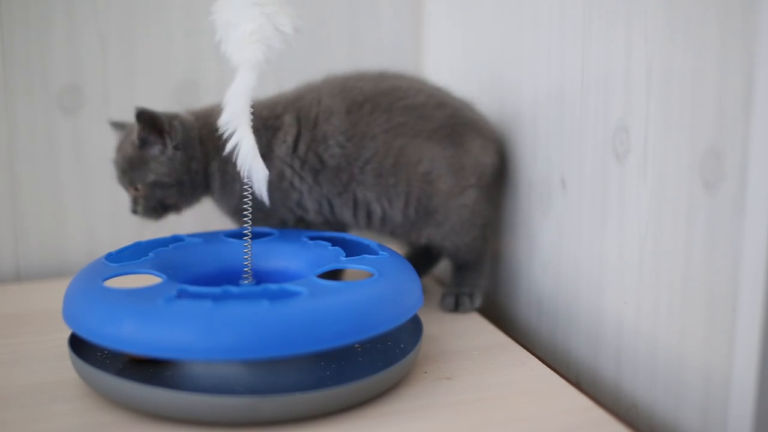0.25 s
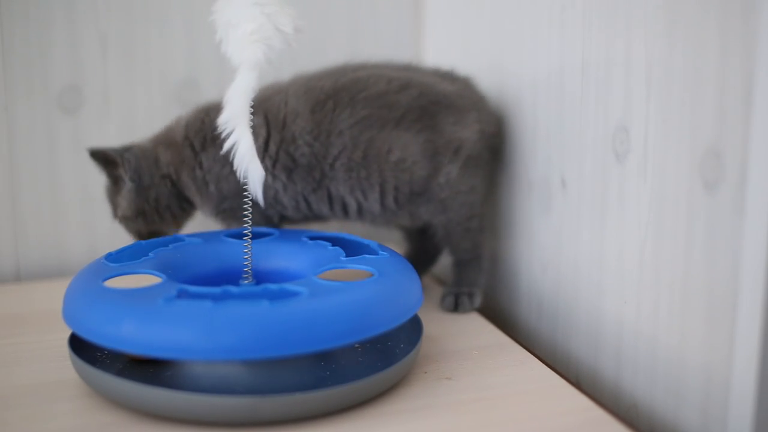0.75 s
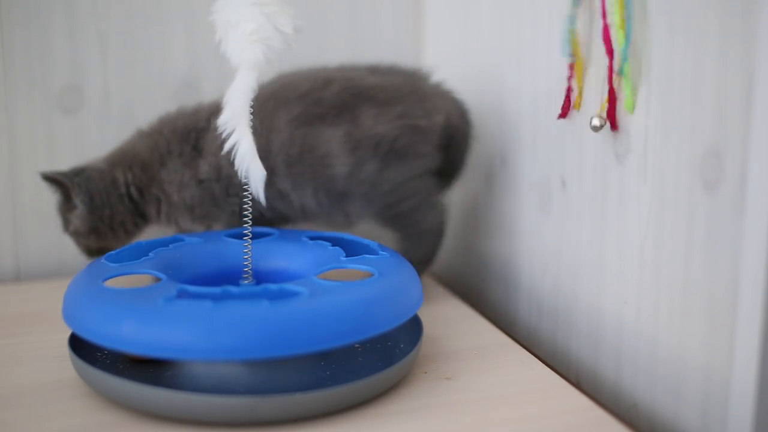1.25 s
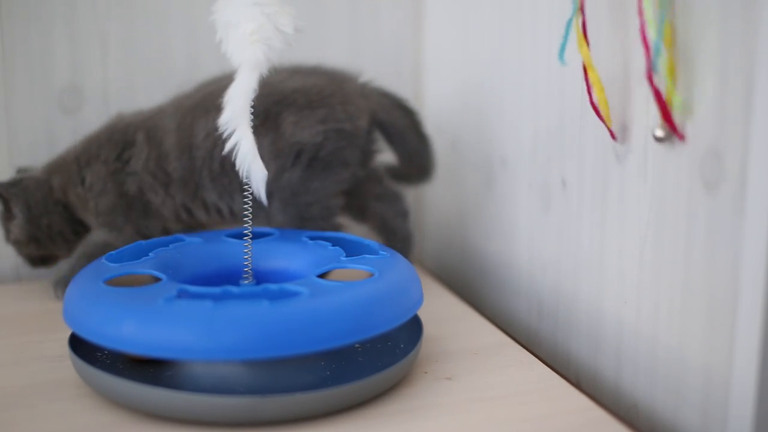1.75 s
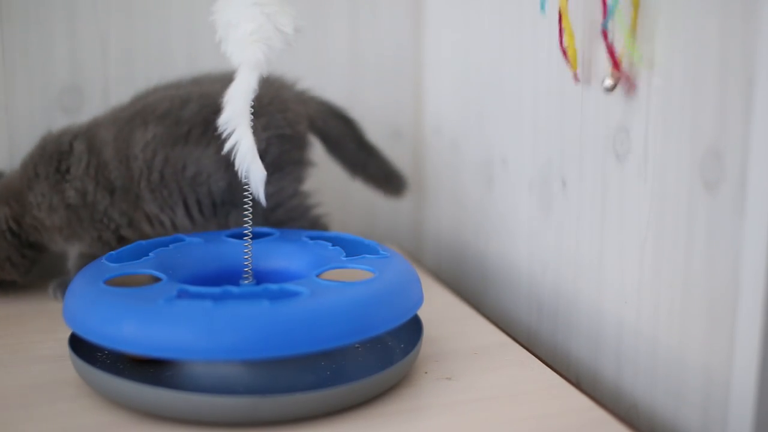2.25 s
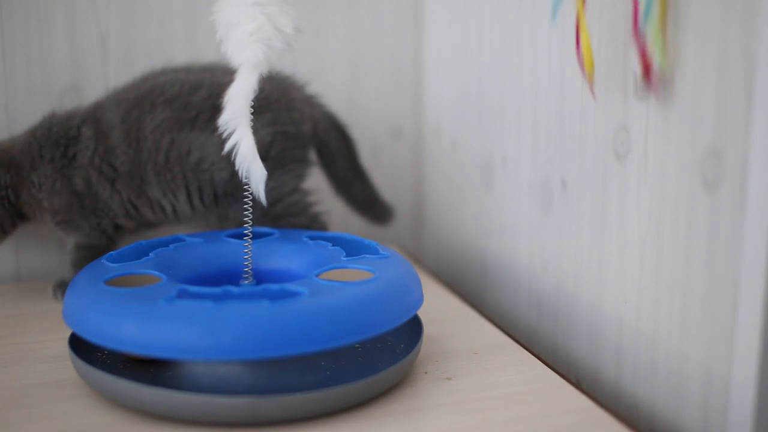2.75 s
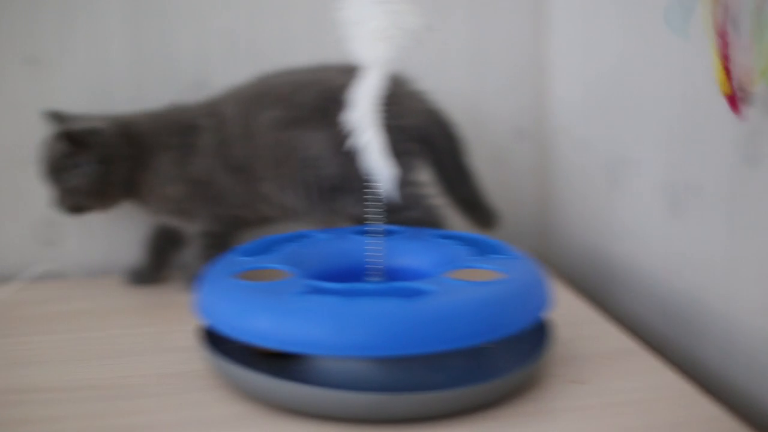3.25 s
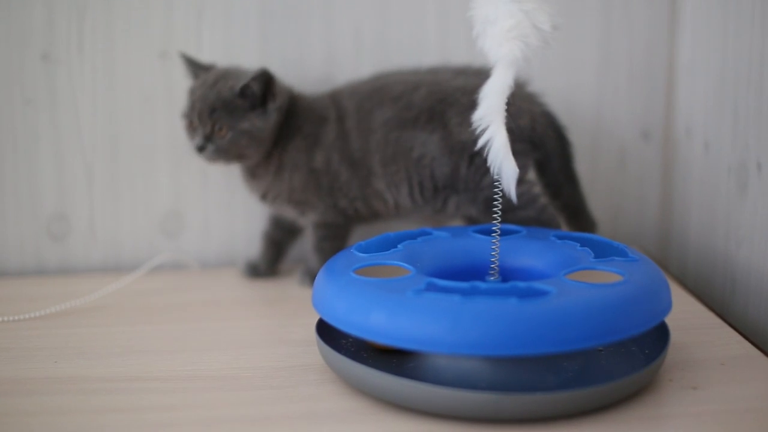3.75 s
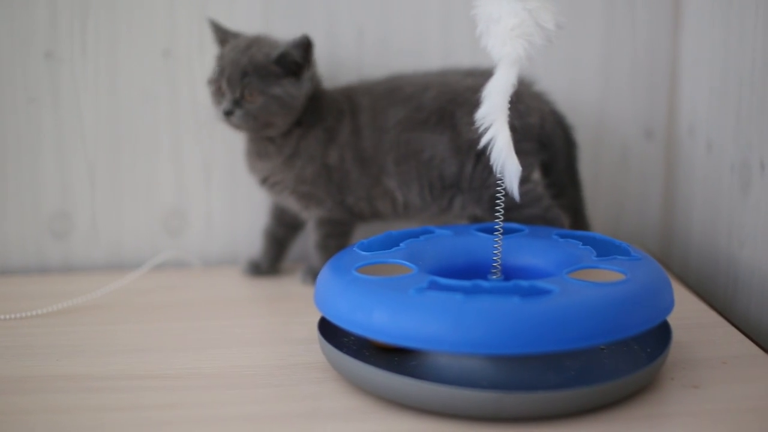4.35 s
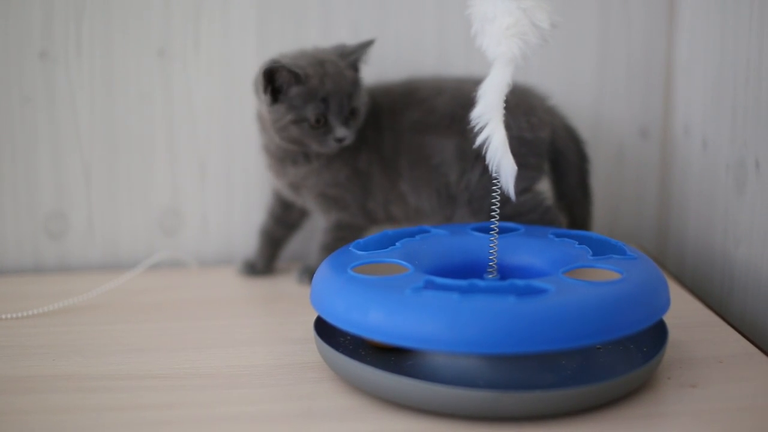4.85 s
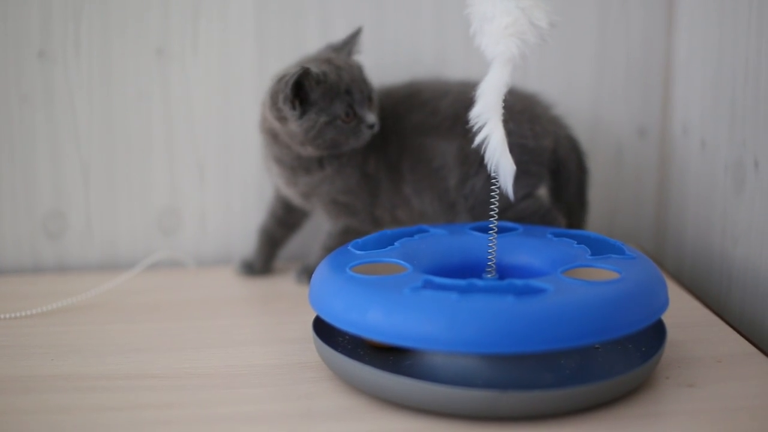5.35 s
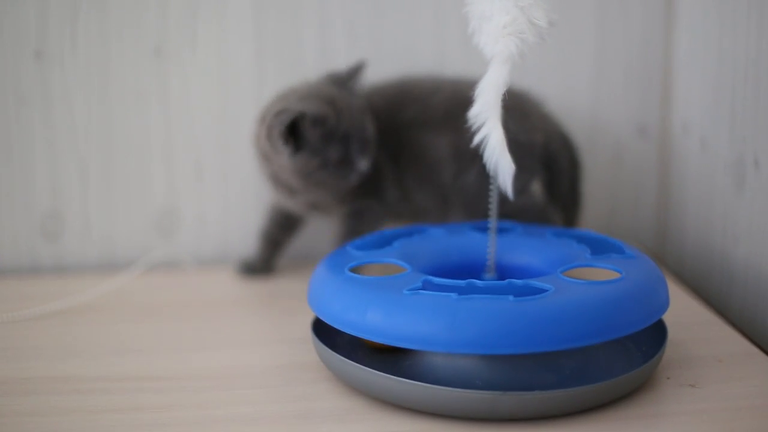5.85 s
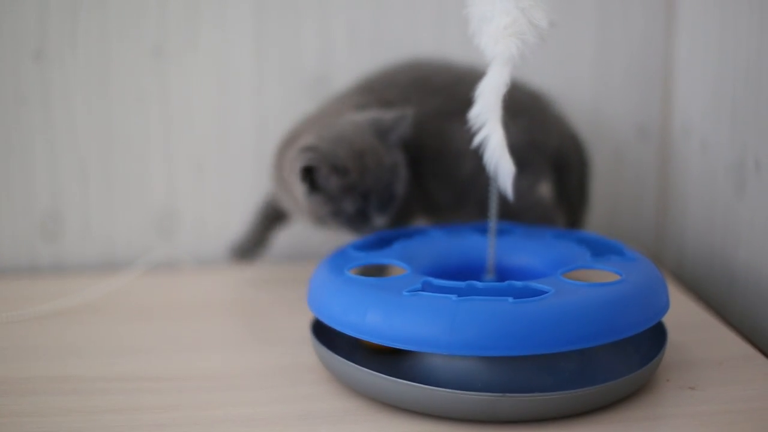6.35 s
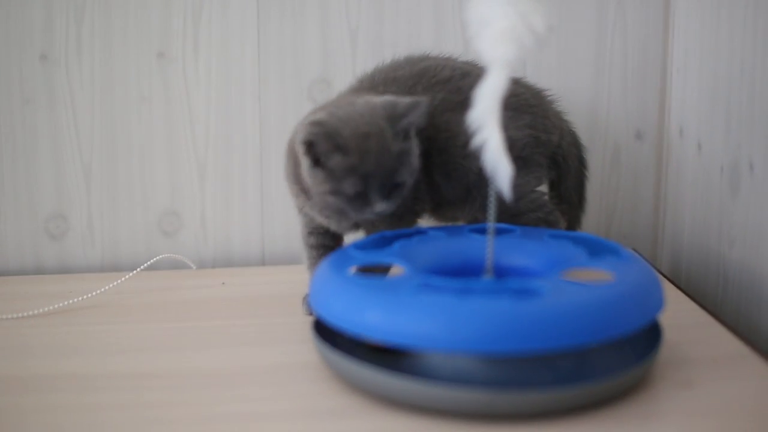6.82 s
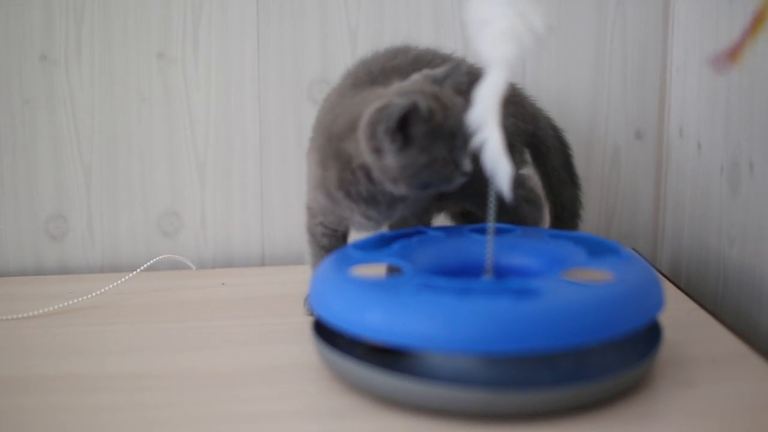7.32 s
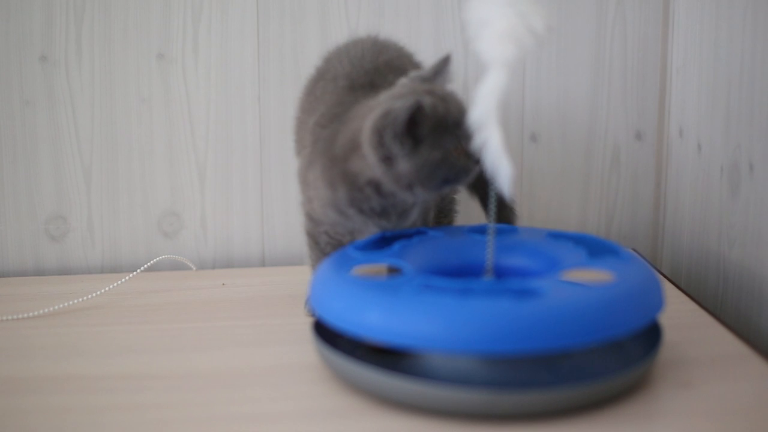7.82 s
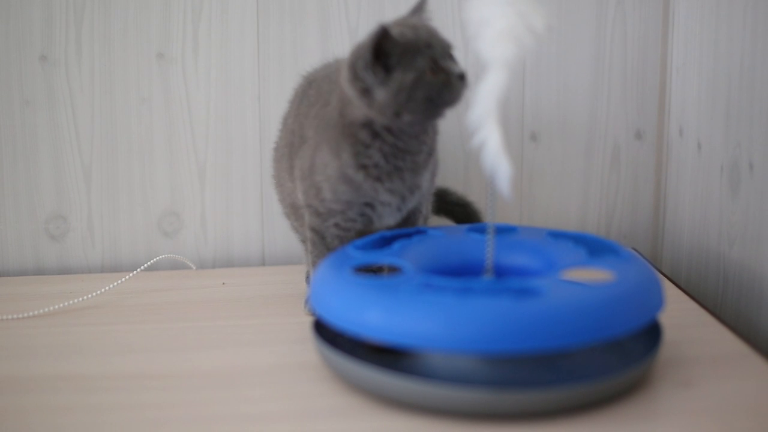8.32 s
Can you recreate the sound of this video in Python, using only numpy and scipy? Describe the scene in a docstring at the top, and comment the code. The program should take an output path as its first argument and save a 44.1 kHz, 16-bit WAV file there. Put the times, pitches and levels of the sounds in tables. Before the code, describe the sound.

Hollow wooden knocks from a kitten's light steps and toy contacts, with hard plastic clicks, small jingling bells, low rubs and scrapes over steady hiss.

```python
"""A toy wand on a hollow wooden surface in a small room, over a steady hiss of filtered noise.
Low rubs, made of resonant noise, and jingling bells, made of struck modes, open at about 1.2 s. From 1.4 s
taps ring the wood: filtered pulses, echoes and decaying sines. Hard plastic clicks, short filtered crackles,
crowd in near 3 s among gritty noise scrapes and soft thumps of damped sine. At 5.1 s a scuff rings, more
rubbing follows, then come the last taps, a bell jingle near 7.6 s and one final click at 8.5 s."""
import sys
import numpy as np
from scipy import signal
from scipy.fft import rfft, irfft, next_fast_len
from scipy.io import wavfile
from scipy.ndimage import uniform_filter1d

SR = 44100
rng = np.random.default_rng(int(sys.argv[2]) if len(sys.argv) > 2 else 0)


def how_loud(loudness_db):
    """Turn decibels into a plain amplitude multiplier (0 dB gives 1, 20 dB gives 10)."""
    steps = np.asarray(loudness_db, float) / 20
    return 10 ** steps


def output_pcm(signal):
    """Save a mono or channel-first signal as 16-bit PCM at the path in sys.argv[1].

    Samples are clipped to [-1, 1] before scaling.
    """
    pcm = np.clip(np.atleast_2d(signal).T, -1, 1) * 32767
    wavfile.write(sys.argv[1], SR, np.round(pcm).astype(np.int16))


N = 378378
SPAN = SR * 2 // 5  # samples given to one ring or room tail


def unit(x):
    """Scales a signal to rms 1."""
    return x / np.sqrt(np.mean(x ** 2) + 1e-20)


def along(points, hz):
    """Reads (Hz, value) points on a log frequency axis."""
    f, v = np.transpose(points)
    return np.interp(np.log(hz + 1), np.log(f + 1), v)


def spectrum(points):
    """Turns (Hz, dB) points into a gain of frequency."""
    return lambda hz: how_loud(along(points, hz))


def resonant(peaks):
    """Sums band-pass resonances, each (centre Hz, width Hz, dB), into one response of frequency."""
    return lambda f: sum(how_loud(db) * 1j * f * w / (c * c - f * f + 1j * f * w) for c, w, db in peaks)


def bump(hz, centre_hz, octaves):
    """A bell-shaped weight on a log frequency axis."""
    return np.exp(-.5 * (np.log2((hz + 1) / centre_hz) / octaves) ** 2)


def noise(response):
    """Noise of rms 1 coloured by a response of frequency."""
    m = next_fast_len(N)
    white = rfft(rng.standard_normal(m))
    return unit(irfft(white * response(np.fft.rfftfreq(m, 1 / SR)), m)[:N])


def pulse(db, size=2048):
    """The most compact causal (minimum-phase) pulse with the dB spectrum db(Hz), peak 1."""
    cepstrum = irfft(np.log(how_loud(db(np.fft.rfftfreq(size, 1 / SR)))), size)
    cepstrum[1:size // 2] *= 2  # fold the backward half of time onto the forward half
    cepstrum[size // 2 + 1:] = 0
    p = irfft(np.exp(rfft(cepstrum)), size)
    return p / np.abs(p).max()


def add(track, s, sound):
    """Mixes a sound into the track at s seconds."""
    part = track[round(s * SR):][:len(sound)]
    part += sound[:len(part)]


def tail():
    """A new diffuse room answer of energy 1: noise in which each frequency dies at its own speed."""
    # room decay: f/Hz, time to fall by 60 dB/s
    room_decay = [(120, 0.54), (400, 0.25), (1000, 0.31), (2800, 0.37), (7000, 0.4), (15000, 0.22)]
    hz, t, z = signal.stft(rng.standard_normal(SPAN), SR, nperseg=256)
    t60 = np.clip(along(room_decay, hz), .05, 2)[:, None]
    x = signal.istft(z * how_loud(-60 * t / t60), SR, nperseg=256)[1][:SPAN]
    x = x * (1 - np.exp(-np.arange(SPAN) / SR / 0.00033))  # soft onset
    return x / np.linalg.norm(x)


def grit(rate, depth_db):
    """Random gain of rms 1 that heads for a new value rate times a second."""
    knots = rng.standard_normal(int(N * rate / SR) + 2)
    return unit(how_loud(depth_db * np.interp(np.arange(N) * rate / SR, np.arange(len(knots)), knots)))


def strokes(rows):
    """Gains of both layers: each stroke presses down, fades as it slows, and lets go."""
    rise = 0.093  # share of a stroke spent pressing down
    gain = np.zeros((2, N))
    for s, length, first_db, second_db, fade_db in rows:
        u = np.linspace(0, 1, round(length * SR))
        shape = np.minimum(u / rise, 1) * how_loud(-fade_db * np.maximum(u - rise, 0))
        add(gain[0], s, how_loud(first_db) * shape)
        add(gain[1], s, how_loud(second_db) * shape)
    return uniform_filter1d(gain, size=300, axis=1)


def taps():
    """Each tap is a sharp pulse with early echoes and room tail, and rings the wood at new strengths."""
    # taps, levels before trims: t/s, level/dB, mid/dB, treble/dB, direct spike over the level/dB
    tap_rows = [(1.427, -14.5, -7.5, -35.5, -2), (1.704, -34, -24, -33.5, -5), (1.891, -35, -75, -41, -4),
                (2.013, -29.5, -1, -17, -5), (2.044, -32.5, -14, -26, -7), (2.25, -4, -1, -27.5, 4.5),
                (2.767, -20, -11.5, -31.5, -9), (3.115, -12, -5, -32, -4), (3.28, -15.5, -5.5, -35.5, -6),
                (3.589, -25.5, -11, -39, -22), (3.617, -26.5, 4, -35, -3), (3.837, -7, -4, -32.5, 1),
                (4.213, -1.5, -2, -27.5, 2.5), (4.404, -2, -1, -24, -12), (4.563, -6, -2.5, -28, 2.5),
                (4.743, -25.5, -5, -18, -3), (4.814, -11.5, -5, -32.5, 1), (5.085, -37, -3, -21, 10),
                (5.257, -16, -2.5, -31.5, -9), (6.788, -35, -21, -33.5, -6), (6.811, -40, -22, -29, 0),
                (7.2, -12, 0.5, -30.5, 1), (7.56, -29, -14, -33, -13), (7.895, -9.5, -2, -34, -4),
                (8.284, -6, -1.5, -32, 2), (8.473, -16, -4.5, -37, -12)]
    # modes of the wood: f/Hz, relative level/dB, longest time to fall by 60 dB/s
    wood_modes = [(188, -12.5, 0.85), (277.8, -7, 0.23), (340, -1, 0.18), (426, -5, 0.53), (477, -51, 0.11),
                  (580, -1, 0.5), (600.9, 1.5, 0.15), (612.6, 2, 0.19), (679, -8.5, 0.31),
                  (680, -4.5, 0.63), (731, -5, 0.66), (857.5, -2, 0.086), (961, -9.5, .28), (923, -9.5, .3),
                  (1054, -5.5, .28), (1143, -19.5, 0.068), (1343, -14, 0.9), (1450, -12.5, 0.57),
                  (1830, -24, 0.98), (1982, -15.5, 0.33)]
    # colour of a blow before its own mid and treble: f/Hz, relative level/dB
    blow_colour = [(40, -66), (100, -17.5), (220, -19), (340, 0), (490, -6), (620, -3.5), (1100, -8),
                   (2800, -21), (4500, -23.5), (8000, -27.5), (11500, -27.5), (16000, -41.5)]
    # early echoes off the walls, before the tap's own gain: delay/s, level/dB
    wall_echoes = [(.0022, -8), (.0036, -9), (.0058, -16.5), (.0095, -15)]
    out, t = np.zeros(N), np.arange(SPAN) / SR
    # close neighbours make each mode beat, alike at every tap
    knots = rng.standard_normal((len(wood_modes), 2, 30))
    beats = [np.interp(t, np.arange(30) / 70, a + 1j * b) for a, b in knots]
    corner = tail()  # the taps land near one spot and share much of their echo
    tick = pulse(lambda hz: 40 * bump(hz, 9500, 0.74), size=256)
    for s, db, mid_db, treble_db, spike_db in tap_rows:
        def harder(hz):
            """Mid and treble lift of this tap in dB."""
            return (mid_db + 10.5) * bump(hz, 2310, 0.79) + (treble_db + 27.5) * bump(hz, 7900, 1.0)

        def direct(hz):
            """Spectrum in dB of the direct sound, which is brighter."""
            lows_and_top = 14 * bump(hz, 61, 0.8) + 6 * bump(hz, 13000, 0.56)
            return 0.76 * along(blow_colour, hz) + harder(hz) - lows_and_top

        blow = pulse(lambda hz: along(blow_colour, hz) + harder(hz))
        space = how_loud(9) * (.6 * corner + .8 * tail())
        for delay, wall_db in wall_echoes:
            space[round(delay * SR)] += how_loud(wall_db)
        add(out, s, how_loud(db - 0.5) * signal.fftconvolve(blow, space)[:SPAN])

        ring = np.zeros(SPAN)
        for (hz, mode_db, t60), beat in zip(wood_modes, beats):
            fall_db = 60 * (t / min(t60, 0.2 + 15 / hz)) ** 1.336  # holds, then falls fast
            strength = how_loud(mode_db + harder(hz) + rng.normal(0, 1.37) - fall_db)
            swing = 1.1 * np.exp(.6j * rng.normal()) + .5 * beat
            ring += strength * (swing * np.exp(2j * np.pi * hz * t)).imag
        ring *= 1 - np.exp(-t / (0.0029 * how_loud(-spike_db)))  # soft taps swell
        add(out, s, how_loud(db - 20.0) * ring)

        add(out, s, how_loud(db + spike_db + 2.0) * pulse(direct))
        # something loose ticks just after the blow
        rattle = rng.standard_normal(300) * how_loud(-60 * t[:300] / 0.0097)
        add(out, s + 0.0055, how_loud(db + treble_db - 9.0) * np.convolve(rattle, tick))
    return out


def clicks():
    """A few milliseconds of crackle in a broad mid resonance and in the treble, with some room."""
    # plastic clicks, body and treble before trims: t/s, body level/dB, centre f/Hz, treble level/dB, room/dB
    click_rows = [(1.724, -38.5, 1550, -47, 11.5), (1.8137, -25, 3070, -33.5, 5),
                  (2.8395, -13, 1830, -43, -8), (2.8516, -12.5, 2490, -31, 6.5),
                  (2.8778, -7, 1390, -20, -5), (2.8799, -3, 1400, -32, -21), (3.0492, -13.5, 1130, -51, -1),
                  (3.054, -16.5, 1730, -47, -25), (3.1449, -1, 2400, -35, -12),
                  (3.1485, -4.5, 1580, -33, -3.5), (3.1626, -13, 1360, -37, -14),
                  (3.1956, -14.5, 2460, -46, -4.5), (3.5887, -21.5, 1340, -60, -6),
                  (3.6177, -16.5, 1290, -41, -5), (3.626, -16, 1310, -47, -12.5),
                  (4.7084, -27.5, 2980, -37.5, 8), (4.7541, -20.5, 2490, -32.5, 7),
                  (5.0877, -28.5, 1600, -35, -6), (5.448, -37, 1810, -35, 2), (5.474, -23.5, 1230, -43, -8),
                  (5.4881, -23, 2100, -48, 2), (5.5132, -10, 1610, -64, 4), (5.566, -28, 1830, -41.5, 5.5),
                  (5.66, -24, 2820, -44, -21), (5.679, -29, 1830, -56, -15), (5.713, -40, 2040, -49, -8),
                  (5.772, -39, 2130, -49, -1), (5.7983, -32, 4140, -59, -4), (5.8167, -33, 3950, -51, -15),
                  (5.877, -33.5, 2070, -40, -9), (5.885, -41, 2000, -45, -15),
                  (6.3611, -10.5, 3430, -20, -11.5), (6.3958, -20.5, 1880, -35, -13),
                  (6.3992, -18, 3590, -35, -21), (8.5281, -22.5, 1410, -31, -17)]
    out, t = np.zeros(N), np.arange(SR // 20) / SR
    fine = pulse(lambda f: 40 * bump(f, 7570, 0.57), size=512)
    fine /= np.linalg.norm(fine)
    for s, db, hz, treble_db, room_db in click_rows:
        # 15 ms to fall by 60 dB at a table level of -20 dB; harder clicks last longer
        t60 = 0.015 * how_loud(0.061 * (db + 20))
        crackle = rng.standard_normal(len(t)) * how_loud(-60 * t / max(t60, .002))
        crackle /= np.linalg.norm(crackle)
        body = pulse(lambda f: 40 * bump(f, hz, 1.66) - 12 * bump(f, 14000, 1.0), size=512)
        body /= np.linalg.norm(body)
        colour = how_loud(db + 11) * body + how_loud(treble_db + 16.5) * fine
        add(out, s, signal.fftconvolve(crackle, colour))
        add(out, s, how_loud(room_db) * signal.fftconvolve(colour, tail()))
    return out


def bells():
    """A shake strikes the bell modes, then the pellets bounce on; many weak modes blur into a shimmer."""
    # shakes, levels before trims: t/s, level of mode groups 0, 1 and 2/dB (three columns), shimmer level/dB
    shake_rows = [(1.24, -49, -60, -55, -45), (1.3024, -55, -68, -65, -49), (1.7676, -55, -63, -56, -48),
                  (2.1115, -37.5, -47.5, -46.5, -38), (2.1497, -40, -62, -61, -54),
                  (2.7359, -29, -50, -34, -31), (2.75, -30, -47.5, -49, -37), (2.8034, -50, -56, -54, -62),
                  (2.9462, -40.5, -47, -42, -28.5), (2.9994, -52, -51, -48, -49),
                  (3.1274, -43, -54, -46, -27.5), (3.3078, -30.5, -47, -47, -31.5),
                  (3.3385, -56, -60, -48, -48), (3.458, -49, -49, -47, -34.5), (3.604, -50, -66, -52, -41),
                  (4.8419, -43, -51, -45, -37.5), (4.8555, -45, -51, -45.5, -52),
                  (7.5677, -46, -64, -66, -66), (7.5914, -48, -64, -59, -50),
                  (7.653, -41, -53.5, -48, -36.5), (7.708, -46, -54, -57, -57)]
    # bell modes: f/Hz, relative level/dB, ring time before shortening/s, mode group
    bell_modes = [(4125, 3, .18, 1), (4410, 4, .22, 1), (4560, -3, .15, 1), (4872, -8, .2, 0),
                  (4900, 0, .22, 0), (9005, -1, .2, 2), (9606, 0, .2, 2), (10085, 2, .22, 2),
                  (10125, -2, .2, 2), (11538, 3, .2, 2), (11566, 2, .2, 2), (15385, -15, .16, 2)]
    # colour of the shimmer noise: f/Hz, relative level/dB
    shimmer_colour = [(3500, -59), (4500, 0), (6000, -7), (7500, -1), (9500, -2.5), (12000, -20),
                      (16000, -20)]
    out, shimmer, t = np.zeros(N), np.zeros(N), np.arange(SPAN) / SR
    for s, *group_db, shimmer_db in shake_rows:
        # the first blow lands at once, 15 weaker bounces follow
        bounce_s = np.cumsum(rng.exponential(.014, size=16)) * (np.arange(16) > 0)
        strength = how_loud(-60 * bounce_s / 0.33 - 18.7 * (bounce_s > 0))
        place = np.minimum(bounce_s * SR, SPAN - 1).astype(int)
        for hz, db, t60, group in bell_modes:
            spread_db = rng.normal(0, 5.0, size=16) * np.where(bounce_s > 0, 1, 0.4)
            phase = np.exp(2j * np.pi * rng.random(size=16))
            blows = np.zeros(SPAN, complex)
            blows[place] = strength * how_loud(spread_db) * phase
            pole = how_loud(-60 / (0.62 * t60 * SR)) * np.exp(2j * np.pi * hz / SR)
            ring = signal.lfilter([1], [1, -pole], blows).real
            add(out, s, how_loud(db + group_db[group] - 2) * ring)
        fade = how_loud(shimmer_db - 4.5 - 60 * t / 0.35)
        add(shimmer, s, fade * (1 - np.exp(-t / 0.0025)))
    out += how_loud(5.0) * signal.fftconvolve(out, tail())[:N]
    return out + shimmer * noise(spectrum(shimmer_colour))


def scrapes():
    """Sliding friction: gritty noise in a mid scrape and a fine hiss that share each stroke."""
    # sliding strokes: t/s, length/s, scrape level/dB, hiss level/dB, fade rate/dB per stroke length
    slide_rows = [(1.52, .17, -53, -56.5, 7), (1.81, 0.087, -45, -53, 18), (1.99, 0.058, -50, -53, 18),
                  (2.38, 0.337, -50, -54, 8.5), (2.855, 0.079, -22.5, -29, 15),
                  (2.935, 0.087, -37, -41, 14), (3.155, 0.054, -28, -43, 18), (3.19, 0.071, -47, -44.5, 11),
                  (3.59, .12, -51, -61, 15), (5.095, 0.055, -40, -48, 12), (5.145, .11, -48.5, -51, 0),
                  (5.44, 0.071, -50.5, -50.5, -6), (5.5, 0.17, -34, -54, 26), (5.652, 0.032, -46, -56, 5),
                  (5.69, 0.26, -52, -59, 5), (6.04, 0.15, -51, -60.5, 11), (6.405, 0.1, -54, -62, -4),
                  (6.5, 0.26, -45.5, -53.5, 12)]
    # colour of the scrape: f/Hz, relative level/dB
    scrape_colour = [(290, -6.5), (500, -4.5), (538, -12.5), (904, -2.5), (1070, -32.5), (1360, -4.5),
                     (2190, -6.5), (6000, -15), (7800, -49), (13200, -120)]
    # colour of the fine hiss: f/Hz, relative level/dB
    hiss_colour = [(4500, -31), (6000, 11), (8500, 8.5), (11000, 4), (13500, -3), (16000, -12)]
    coarse, fine = strokes(slide_rows)
    scrape = coarse * grit(300, depth_db=3.0) * noise(spectrum(scrape_colour))
    return scrape + fine * grit(200, depth_db=0.5) * noise(spectrum(hiss_colour))


def scuff():
    """One ringing scuff: gritty noise in resonances, rolled off above 9 kHz, silent outside its curve."""
    # level curve of the scuff: t/s, level/dB
    scuff_points = [(5.13, -46), (5.146, -41), (5.198, -33.5), (5.252, -48), (5.26, -35)]
    # what the scuff rings in: f/Hz, width/Hz, relative level/dB
    shell_peaks = [(2030, 180, 5), (2700, 480, 10), (4470, 780, 3), (7340, 760, -25)]
    s, db = np.transpose(scuff_points)
    gain = np.interp(np.arange(N) / SR, s, how_loud(db), 0, 0)
    gain = uniform_filter1d(gain, size=300)  # soft edges
    shell = resonant(shell_peaks)
    return gain * grit(150, depth_db=2.5) * noise(lambda hz: shell(hz) / (1 + (hz / 9000) ** 4))


def rubs():
    """Low rubbing: gritty noise in hollow resonances, with a rumble under each stroke."""
    # rubbing strokes: t/s, length/s, rub level/dB, rumble level/dB, fade rate/dB per stroke length
    rub_rows = [(1.21, 0.27, -57, -65, 10), (1.66, 0.18, -51, -61, 1), (1.885, .2, -50.5, -68, 16),
                (2.46, 0.11, -49.5, -77, 11), (2.585, 0.15, -45, -77, 16), (2.805, 0.064, -39.5, -55, 8),
                (2.855, 0.19, -29.5, -39.5, 27), (3.125, 0.088, -23.5, -47, 37),
                (3.56, 0.027, -44.5, -46, 1), (3.63, 0.19, -39, -46, 23.5), (4.05, 0.097, -53.5, -67, 4),
                (4.445, 0.13, -50, -41, 17), (5.08, .08, -41, -47, 28), (5.54, .1, -45, -43, 14),
                (5.66, 0.41, -47.5, -70, 12), (6.02, .07, -61, -50, 9), (6.1, 0.11, -44, -51, 24),
                (6.415, 0.023, -36, -71, 21), (6.46, 0.28, -50, -81, 4.5), (8.09, 0.24, -51.5, -63, 2)]
    # what the rubbing sounds in: f/Hz, width/Hz, relative level/dB
    hollow_peaks = [(194, 45, -14), (277, 10, 3), (328, 77, -5), (550, 140, -14.5)]
    # colour of the rumble: f/Hz, relative level/dB
    rumble_colour = [(15, -40), (40, -18), (90, -20), (160, -4), (300, -50)]
    rubbing, shaking = strokes(rub_rows)
    rub = rubbing * grit(30, depth_db=1.5) * noise(resonant(hollow_peaks))
    return rub + shaking * noise(spectrum(rumble_colour))


def thumps():
    """Soft contacts: one low, quickly damped swing, dead (down 60 dB) after 16.3 cycles."""
    # soft thumps, level before a trim: t/s, level/dB, f/Hz
    thump_rows = [(2.826, -37, 99.6), (3.499, -42, 114), (3.589, -23, 236), (3.617, -20.5, 232),
                  (3.64, -25, 205), (4.459, -33, 192), (5.078, -46, 116), (5.508, -29.5, 113.4),
                  (5.55, -35, 115), (6.03, -45, 105), (6.24, -54, 110), (6.101, -39, 188),
                  (6.361, -27, 433), (6.402, -33.5, 248)]
    out, t = np.zeros(N), np.arange(SPAN) / SR
    for s, db, hz in thump_rows:
        fade = how_loud(db + 5 - 60 * t * hz / 16.3)
        add(out, s, fade * (1 - np.exp(-t / 0.0051)) * np.sin(2 * np.pi * hz * t))
    return out


def hissing_floor():
    """The steady hiss of room and microphone: coloured noise at -56.5 dB rms."""
    # colour of the floor: f/Hz, relative level/dB
    floor_colour = [(12, -38.5), (20, -13.5), (164, -8), (200, -7.5), (223, -16), (272, -5.5), (381, -14),
                    (1460, -17), (6300, -26.5), (15000, -30), (16400, -44)]
    return how_loud(-56.5) * noise(spectrum(floor_colour))


def scene():
    """All sources near the microphone over the steady floor."""
    handling = scrapes() + scuff() + rubs() + thumps()
    return (taps() + clicks() + bells() + handling + hissing_floor())[None]


def low_pass(x):
    """Removes everything above the highest recorded frequency."""
    return signal.sosfilt(signal.butter(12, 16510, fs=SR, output="sos"), x)


def record(dry):
    """The microphone colours the sound, and peaks beyond full scale are clipped."""
    # microphone response before scaling to gain 1 at 0 Hz: f/Hz, level/dB
    microphone_colour = [(3800, 1), (4700, -0.5), (5800, -5), (8500, -1), (15600, 0.5), (16000, -24)]
    colour = pulse(lambda hz: along(microphone_colour, hz), size=512)
    heard = signal.fftconvolve(dry[0], colour / np.sum(colour))[None, :N]
    return low_pass(np.clip(heard, -1, 1))


dry = scene()
out = record(dry)
output_pcm(out)
```